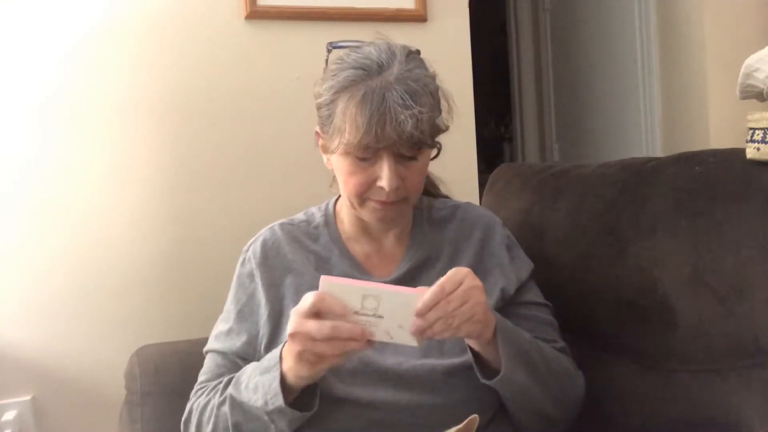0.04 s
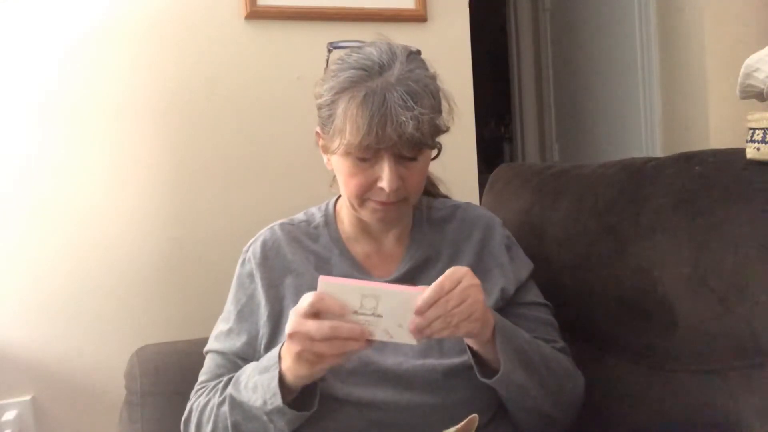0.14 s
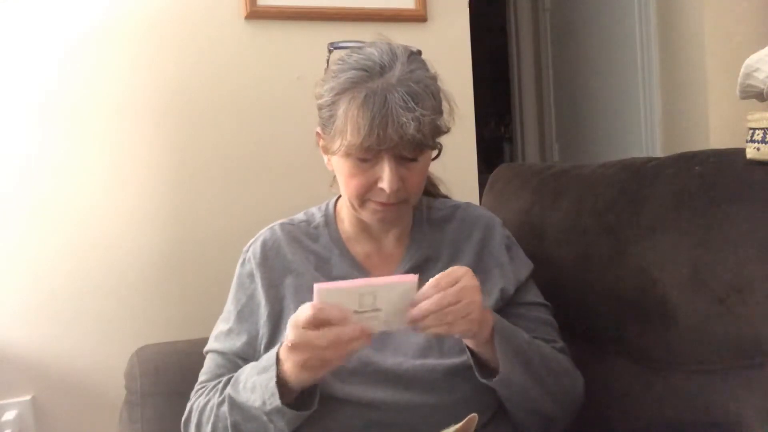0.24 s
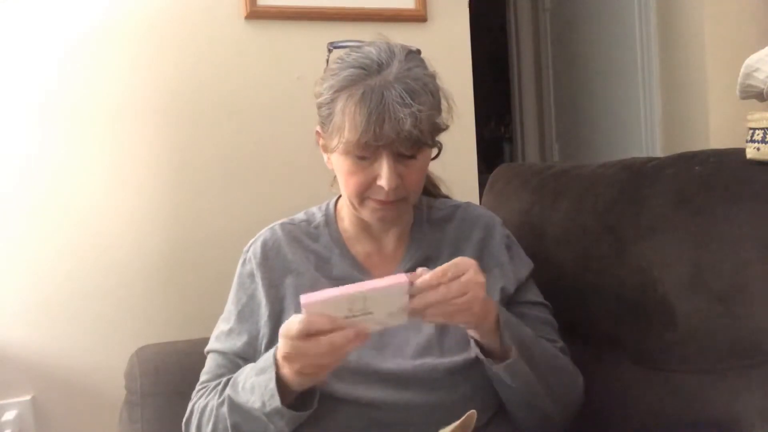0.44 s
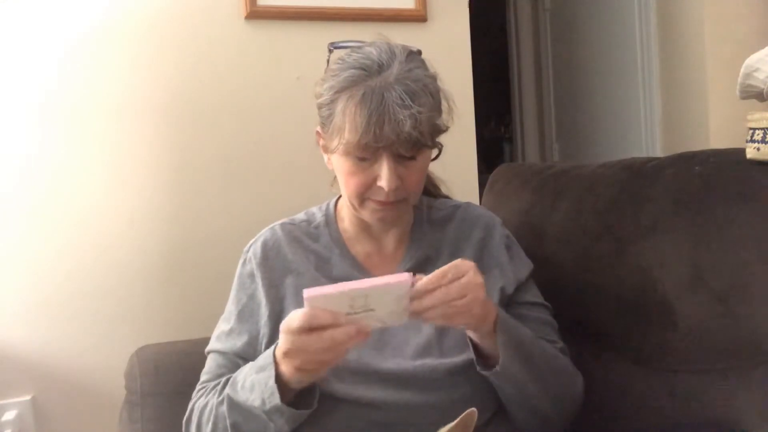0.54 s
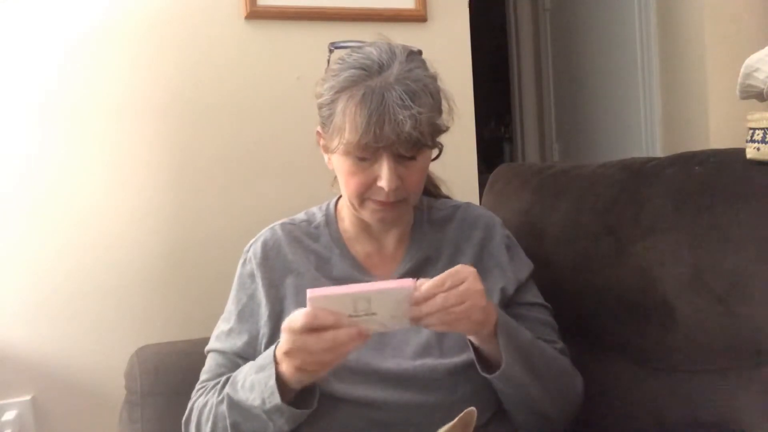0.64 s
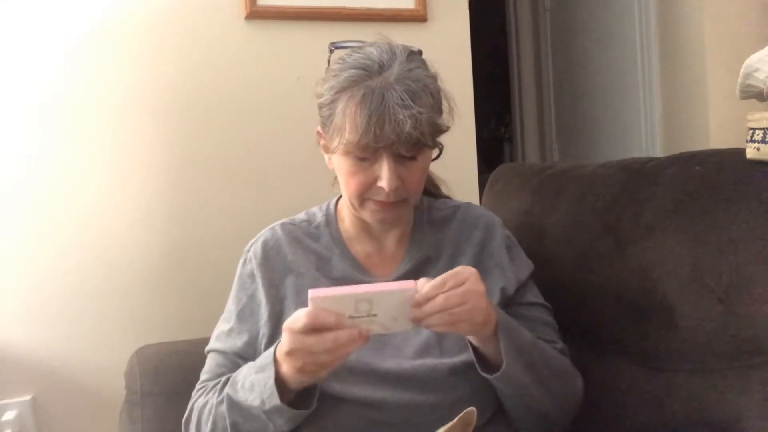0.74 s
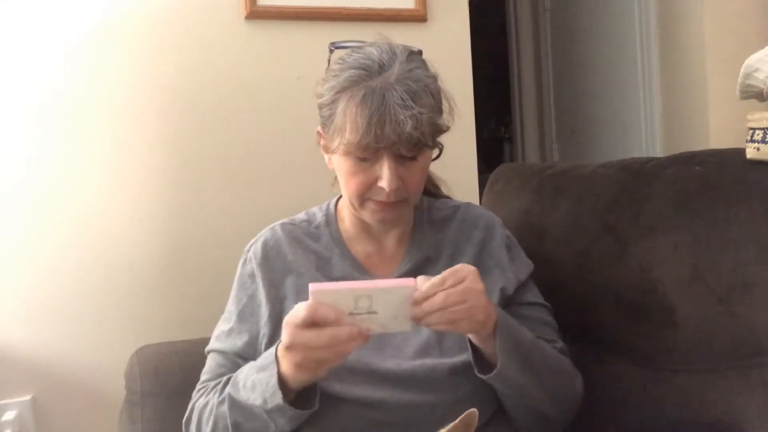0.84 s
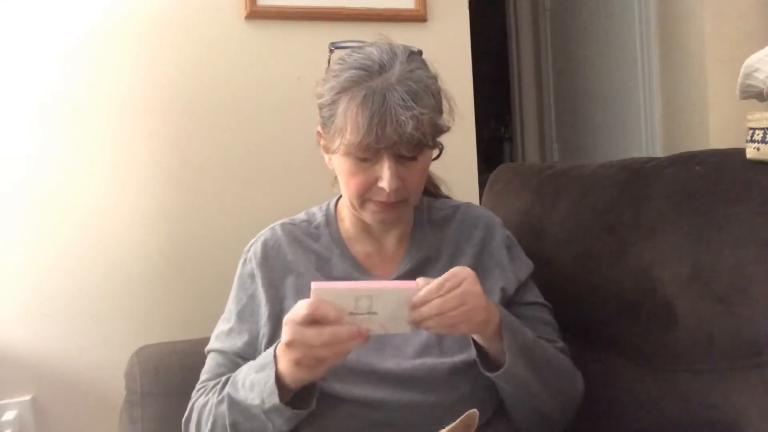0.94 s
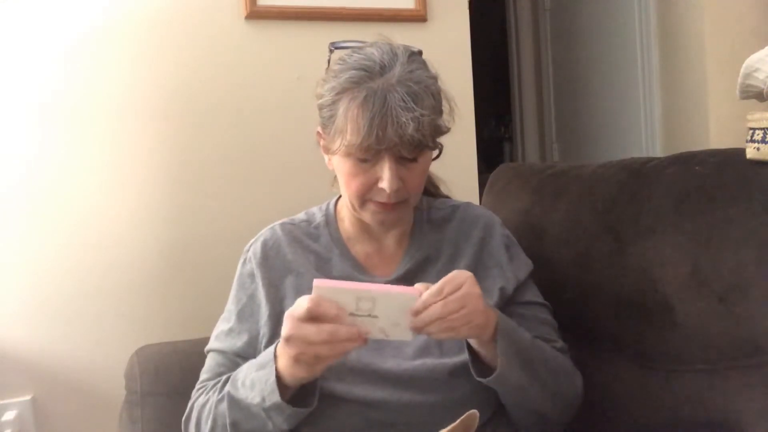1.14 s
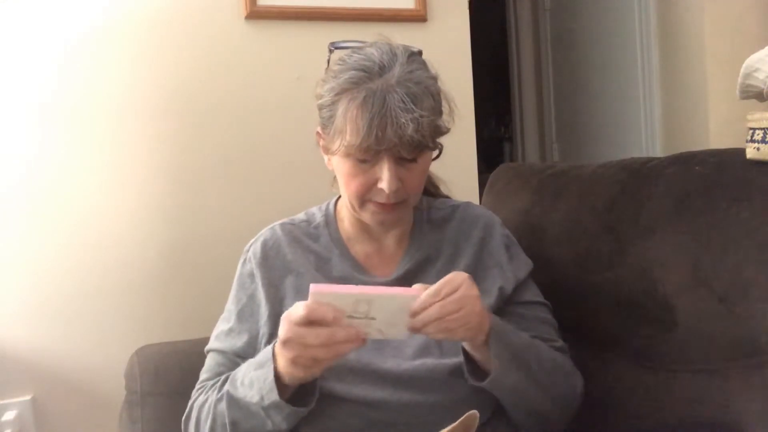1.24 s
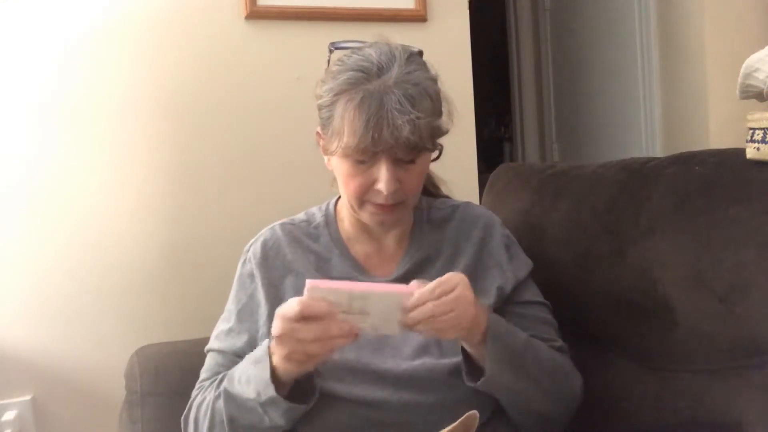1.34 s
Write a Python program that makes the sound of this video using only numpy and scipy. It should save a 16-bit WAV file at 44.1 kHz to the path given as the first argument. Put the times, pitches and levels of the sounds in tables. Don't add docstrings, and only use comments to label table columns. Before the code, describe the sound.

Fingernails pick at a small card box: one loud snap, light ticks, a softer late click.

```python
import sys
import numpy as np
from scipy import signal
from scipy.fft import rfft, irfft, next_fast_len
from scipy.io import wavfile
from scipy.ndimage import uniform_filter1d, map_coordinates

SR = 44100
rng = np.random.default_rng(int(sys.argv[2]) if len(sys.argv) > 2 else 0)


def amp(db):
    return 10 ** (np.asarray(db, float) / 20)


def pcm_store(signal):
    levels = np.round(np.clip(np.atleast_2d(signal), -1, 1) * 32767)
    wavfile.write(sys.argv[1], SR, levels.astype(np.int16).T)


N = 61739

# (time [s], peak [dB], slip length [s], bright centre [Hz], thin edge [dB])
FLAP_SNAPS = [(0.2162, -28.5, 0.0046, 3660, -8), (.2159, -33, .0025, 7600, -12),
              (.222, -21, 0.009, 4070, -14), (.225, -16, 0.0011, 5600, -20),
              (.2259, -13.5, 0.0013, 5500, -14), (.2256, -17, 0.0026, 3620, -10),
              (.2275, -19, .0008, 4070, -28), (0.2323, -24.5, 0.0052, 4570, -7),
              (.2405, -28, 0.0033, 4570, -12), (0.408, -49.5, 0.00061, 6800, -6.5),
              (0.619, -75, 0.00077, 2500, -14.5), (.7205, -68, 0.00243, 3000, -25),
              (.7521, -39.5, 0.0013, 5400, -41), (.7523, -50.5, 0.0026, 3200, -16.5),
              (.759, -49.5, 0.0046, 2960, -39), (0.9797, -55, 0.004, 3220, -25),
              (1.038, -56, 0.00097, 4440, -15.5), (1.0382, -65, .001, 2527, -22),
              (1.2549, -53, 0.0031, 3420, -20), (1.285, -46, .006, 6200, 3),
              (1.291, -32.5, .001, 3600, -13), (1.2919, -27.5, 0.0025, 2810, -16),
              (1.3002, -37.5, 0.0021, 3800, -23.5), (1.308, -50, 0.0019, 3890, -29)]
# (time [s], peak [dB], ring centre [Hz])
BOX_KNOCKS = [(.2158, -28, 1900), (.2252, -19, 1560), (.2272, -26, 840), (.2275, -43, 177.9),
              (.2285, -35, 327.7), (.2315, -36.5, 475), (.2358, -31.5, 378), (.407, -50.5, 1250),
              (.618, -58.5, 1500), (.7215, -54.5, 710), (.7521, -43.5, 1580), (.7535, -45.5, 618),
              (1.038, -56.5, 1460), (1.2925, -42, 1840), (1.2945, -53, 450)]
# (strongest at [s], rise [s], fall [s], level
# [dB], centre [Hz])
CARD_RUBS = [(0.215, 0.0068, 0.0023, -55, 2970), (.45, 0.038, 0.018, -70, 3800),
             (.63, 0.013, 0.023, -71.5, 3600), (0.701, 0.017, 0.068, -66, 3600),
             (0.744, 0.033, .01, -71.5, 5640), (0.769, 0.023, 0.0104, -66.5, 5730),
             (0.943, .003, 0.011, -65, 3800), (.958, .01, .012, -70, 6380),
             (.972, 0.021, .005, -64.5, 3550), (1.044, 0.0027, 0.009, -72, 3550),
             (1.156, 0.0077, 0.0088, -78, 3580), (1.254, 0.0045, .015, -60.5, 3200),
             (1.278, 0.0056, 0.036, -53, 2950), (1.29, 0.01, 0.0097, -46.5, 5000),
             (1.315, 0.014, 0.0074, -58.5, 4530), (1.344, 0.06, 0.016, -61, 2520),
             (0.2207, .003, .003, -44, 3807)]
# (time [s], peak [dB], centre [Hz])
NAIL_TICKS = [
    (.9281, -39.5, 14790),
    (.9283, -53.5, 10200),
    (.9308, -55, 10550),
]
# (centre [Hz], width [Hz], level [dB])
BODY_MODES = [(178.3, 163, -0.5), (334.8, 46, 5), (572.5, 38, 9), (755, 56.5, 11.5), (1192, 360, 8),
              (1794, 170, 10), (2460, 610, 10.5)]
# (centre [Hz], width [Hz], level [dB])
CARD_MODES = [(2556, 1400, -16), (3750, 130, -22), (4150, 1400, -17.5), (5336, 270, -16.5),
              (6800, 1800, -10.5)]
# (frequency [Hz], T60 [s])
ROOM_T60 = [(200, 0.37), (1000, .33), (2800, 0.29), (4500, 0.37), (7000, 0.27), (10000, 0.28),
            (15000, 0.24)]
# (frequency [Hz], density [dB per Hz])
AIR_SPECTRUM = [(25, -23.5), (48, -2.5), (170, -10.5), (560, -11.5), (900, -17), (2200, -26.5), (7000, -30),
                (16000, -33.5)]
# (centre [Hz], width [Hz], level [dB])
HUM_BANDS = [(60.3, 8.2, -74.5), (117.2, 3.3, -76), (229, 27, -74), (312.2, 37, -71)]
# (time [s], level [dB])
RUMBLE_SWELL = [
    (0, 0.5),
    (.25, 3),
    (.55, 1.5),
    (.82, 4),
    (1.021, 4.5),
    (1.07, -7.5),
    (1.2, -3),
    (1.288, 4),
    (1.4, -4.5),
]


def filtered(x, response):
    size = next_fast_len(len(x) + 8192)
    spectrum = rfft(x, size) * response(np.fft.rfftfreq(size, 1 / SR))
    return irfft(spectrum, size)[:len(x)]


def unit(x):
    return x / np.sqrt(np.mean(x ** 2) + 1e-20)


def along(points, hz):
    point_hz, value = np.transpose(points)
    return np.interp(np.log(hz + 1), np.log(point_hz + 1), value)


def wobble(rate_hz):
    knots = rng.standard_normal(int(N * rate_hz / SR) + 4)
    return map_coordinates(knots, [np.arange(N) * rate_hz / SR])


def peak(f, hz, width_hz):
    return 1j * f * width_hz / (hz * hz - f * f + 1j * f * width_hz)


def modes(table):
    def response(f):
        return sum((-1) ** k * amp(db) * peak(f, hz, width_hz) for k, (hz, width_hz, db) in enumerate(table))
    return response


def card(x, hz, q, edge_db):
    def response(f):
        flap = peak(f, hz, hz / q) ** 2 * (1 + modes(CARD_MODES)(f))
        edge = amp(edge_db) * peak(f, 12000, 11000) ** 2
        return flap - edge
    return filtered(x, response)


def place(rows, sound):
    length = 4096
    out, t = np.zeros(N + length), np.arange(length) / SR
    for (time_s, peak_db, *how), noise in zip(rows, rng.standard_normal((len(rows), length))):
        x = sound(t, noise, *how)
        out[round(time_s * SR):][:length] += amp(peak_db) * x / abs(x).max()
    return out[:N]


def snaps():
    def snap(t, noise, length_s, hz, edge_db):
        burst = (noise + 3.5 * (t == 0)) * np.exp(-(t / length_s) ** 2)
        return card(burst, hz, 1.46, edge_db)
    return place(FLAP_SNAPS, snap)


def knocks():
    push_s, strike_q = 0.0001, 0.77

    def knock(t, noise, hz):
        push = np.exp(-t / push_s)
        return filtered(push, lambda f: modes(BODY_MODES)(f) * peak(f, hz, hz / strike_q) ** 2)
    return place(BOX_KNOCKS, knock)


def rubs():
    grain_db, grain_hz, rub_q, hiss_db, body_db = 0.5, 500, 1.25, -27, -10
    out, t = np.zeros(N), np.arange(N) / SR
    for time_s, rise_s, fall_s, db, hz in CARD_RUBS:
        drag = rng.standard_normal(N) * amp(grain_db * wobble(grain_hz))
        skin = unit(card(drag, hz, rub_q, hiss_db))
        body = amp(body_db) * unit(filtered(drag, modes(BODY_MODES[3:])))
        age = np.where(t < time_s, (time_s - t) / rise_s, (t - time_s) / fall_s)
        out += amp(db) * (skin + body) * np.exp(-age ** 2)
    return out


def ticks():
    decay_s, width_hz = 0.0007, 3200

    def tick(t, noise, hz):
        click = (0.98 * noise + (t == 0)) * np.exp(-t / decay_s)
        return filtered(click, lambda f: peak(f, hz, width_hz) ** 2)
    return place(NAIL_TICKS, tick)


def room(x):
    level_db, delay_s, patch_db = -12, 0.0022, 1.5
    frame = dict(nperseg=256, noverlap=224)
    hz, t, z = signal.stft(x, SR, **frame)
    age_s = t[None] - delay_s
    linger = (age_s > 0) * amp(-120 * abs(age_s) / along(ROOM_T60, hz)[:, None])
    power = uniform_filter1d(abs(z) ** 2, size=5, axis=0)
    late = abs(signal.fftconvolve(power, linger / linger.sum(axis=1).mean(), axes=1)[:, :len(t)])
    noise = signal.stft(rng.standard_normal(N), SR, **frame)[2]
    patches = amp(patch_db * unit(uniform_filter1d(rng.standard_normal(z.shape), size=24, axis=1)))
    answer = np.sqrt(late) * patches * noise / abs(noise).mean()
    return amp(level_db) * signal.istft(answer, SR, **frame)[1][:N]


def hum_band(hz, width_hz, db):
    return amp(db) * unit(filtered(rng.standard_normal(N), lambda f: peak(f, hz, width_hz) ** 2))


def floor():
    air_db, rumble_hz = -66, 105
    time_s, swell_db = np.transpose(RUMBLE_SWELL)
    swell = amp(np.interp(np.arange(N) / SR, time_s, swell_db - swell_db.mean()))
    air = amp(air_db) * unit(filtered(rng.standard_normal(N), lambda f: amp(along(AIR_SPECTRUM, f))))
    hum = sum(hum_band(*band) for band in HUM_BANDS)
    both = air * amp(0.23 * wobble(4.1)) + hum
    low = filtered(both, lambda f: 1 / (1 + (f / rumble_hz) ** 6))
    return both + (swell - 1) * low


def scene():
    top_hz, tick_top_hz = 15850, 16500
    box = snaps() + knocks() + rubs()
    tick = filtered(ticks(), lambda f: f < tick_top_hz)
    bed = box + room(box + tick) + floor()
    return (filtered(bed, lambda f: f < top_hz) + tick)[None]


def roll_off(x):
    return signal.sosfilt(signal.butter(12, 16590, fs=SR, output="sos"), x)


def record(dry):
    shelf_hz, shelf_db = 8000, -3.5
    mic = filtered(dry[0], lambda f: amp(shelf_db / (1 + (shelf_hz / (f + 1)) ** 16)))
    return roll_off(mic[None])


dry = scene()
out = record(dry)
pcm_store(out)
```